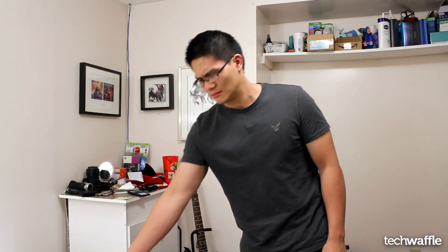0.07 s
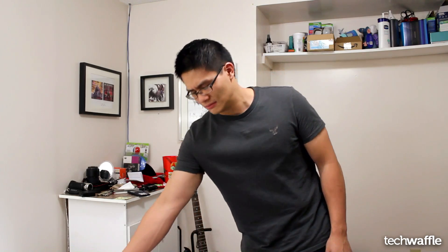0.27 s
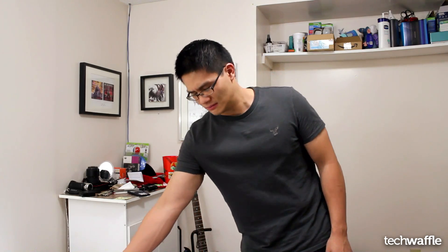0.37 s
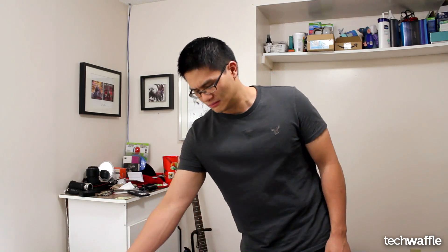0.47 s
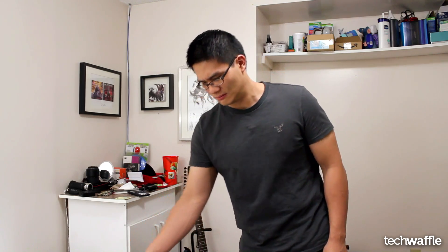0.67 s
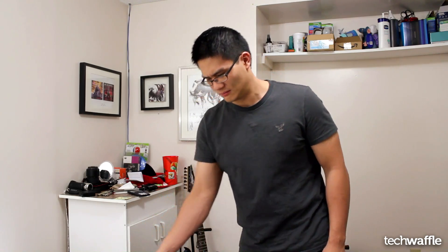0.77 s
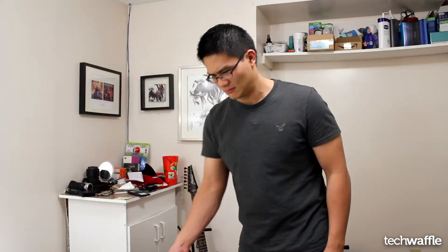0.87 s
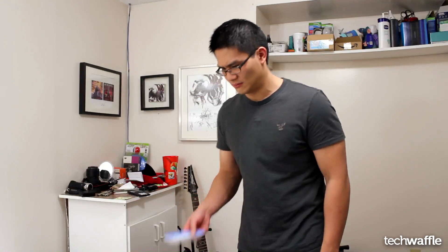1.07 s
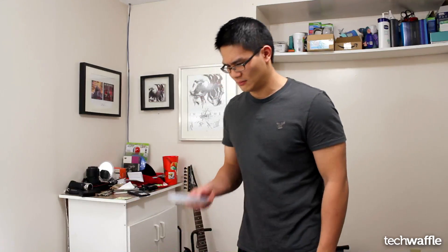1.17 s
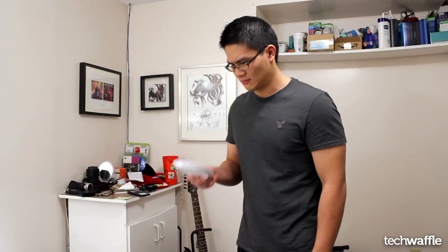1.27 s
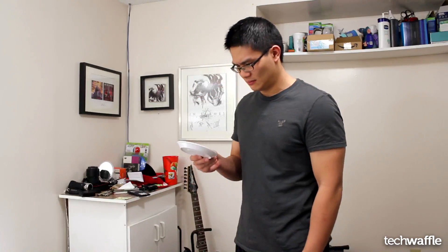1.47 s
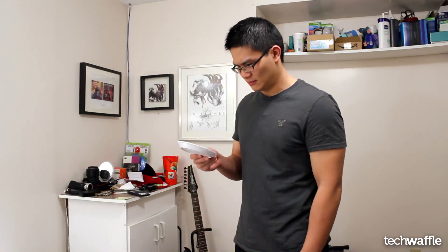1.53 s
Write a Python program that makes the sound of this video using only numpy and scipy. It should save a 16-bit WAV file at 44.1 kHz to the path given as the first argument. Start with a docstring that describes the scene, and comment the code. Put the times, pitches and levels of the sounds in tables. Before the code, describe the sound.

A light, hollow object is dragged over a wooden top in a small, quiet room. It starts with a dull shove at about 0.25 seconds and a close knock at 0.4. A rough, juddering slide follows, ending in a brighter scrape around 0.9 as the object lifts and rings briefly. Faint finger handling comes near 1.5 seconds, over a low hum and soft hiss.

```python
"""Hollow object dragged over wood

A light, hollow object crosses a wooden top in a small, quiet room: a dull shove, a knock, a rough
juddering slide and a brighter scrape as its edge lifts off. Tiny catches of the surface and the
blows ring the same resonances over a stick-slip groan. The freed object sings briefly, then
faint handling and a low hum remain."""
import sys
import numpy as np
from scipy import signal
from scipy.fft import rfft, irfft
from scipy.io import wavfile

SR = 44100
rng = np.random.default_rng(int(sys.argv[2]) if len(sys.argv) > 2 else 0)


def int16_out(signal):
    """Quantize to a 16-bit WAV file."""
    q = np.round(np.clip(np.atleast_2d(signal).T, -1, 1) * 32767)
    wavfile.write(sys.argv[1], SR, q.astype(np.int16))


N = 70560

# tone of the room hiss (frequency [Hz], gain [dB])
AIR_EQ = [(25, -38), (60, -14), (110, -6.5), (180, -7), (260, -5.5), (330, -9), (820, -7.5), (1200, -9),
          (2000, -10.5), (4000, -12.5), (8000, -20.5), (15500, -26)]
# partials of the hum (frequency [Hz], level [dB])
HUM_PARTIALS = [(177.6, -59.5), (403.7, -66.5), (689.1, -65.5), (764.4, -84), (839.8, -63.5)]
# soft finger touches (time [s], width [s], level [dB])
TOUCHES = [(1.478, .012, -51), (1.52, 0.014, -59.5), (1.575, 0.034, -57)]
# tone of the fingers (frequency [Hz], gain [dB])
FINGER_EQ = [(60, -4), (250, 10), (700, -1.5), (1500, 1.5), (4000, -3), (15000, -22)]
# resonances of object, top and room (frequency [Hz], T60 [s], gain [dB])
BODY_MODES = [(163.3, 0.2, 5), (190, 0.17, 4), (245.8, 0.24, 12.5), (284, 0.45, 6.5), (344, 0.25, -13),
              (397.3, 0.13, 10.5), (534, 0.38, 6.5), (558.8, 0.093, 8), (632, 0.5, 4), (744, 0.037, 7),
              (770, 0.18, -1), (801, 0.06, 3.5), (1356, 0.24, 8), (1370.6, 0.26, 10), (1763, 0.027, 2.5),
              (2050, 0.59, -21), (2992, 0.12, 10), (3340, 0.07, -3)]
# knocks and ticks (time [s], relative thud level [dB], relative click level [dB])
BLOWS = [(0.2792, -14.5, -14), (.3125, -16.5, -34), (.4285, -3.5, -3.5), (.4332, -6, -15),
         (.5635, -23, -18.5), (0.889, -31, -25), (0.905, -45, -21.5), (.9215, -26, -23)]
# tone of the dull thud (frequency [Hz], gain [dB])
THUD_EQ = [(30, -28), (85, -41), (150, 5.5), (300, -3), (700, 1), (1100, -10.5), (2000, -6.5),
           (4000, -53.5), (8000, -51), (16000, -65)]
# tone of the edge click (frequency [Hz], gain [dB])
CLICK_EQ = [(100, -45), (1500, 2.5), (4500, 11), (8000, -8), (13000, -4), (16000, -7)]
# tone of the rubbing (frequency [Hz], gain [dB])
RUB_EQ = [(40, -51), (100, -49.5), (150, -2.5), (300, -2), (480, -1), (780, -5.5), (1100, -4), (1800, -8.5),
          (3200, -13.5), (5000, -22), (8000, -23.5), (15000, -47.5)]
# tone of the gritty hiss (frequency [Hz], gain [dB])
GRIT_EQ = [(100, -41), (2500, 2), (6000, 27.5), (8000, 35.5), (13000, 23), (16000, 17.5)]
# strokes of the drag (start [s], attack [s], hold [s], release per 20 dB [s], rub level [dB],
# bass [dB], treble [dB], grit level [dB], contact resonance [Hz], its boost [dB],
# judder rate [Hz], judder level [dB], chatter [0-1])
DRAG_STROKES = [(0.235, 0.013, 0.031, 0.082, -19.5, 0, -7.5, -45.5, 930, 4, 232, -24, .5),
                (0.3, 0.0083, 0.027, 0.058, -21.5, 5, -7, -59, 388, 0, 188, -20.5, 0.55),
                (0.41, 0.016, 0.053, 0.042, -18, 1.5, -7.5, -59, 410, 0, 188, -24, 0.44),
                (0.474, .018, 0.091, 0.095, -22.5, -3, -1.5, -49, 1600, 1, 161.7, -32.5, .45),
                (0.594, 0.036, 0.069, 0.031, -21, 9, 9.5, -46, 360, 18.5, 297.7, -28.5, 0.55),
                (0.684, 0.023, 0.07, 0.093, -18, -3.5, -3, -44, 378, 4, 239.5, -19.5, 0),
                (0.839, 0.0096, 0.062, 0.049, -21.5, -12.5, 6, -41, 1295, 4.5, 162, -27.5, 0.71)]

AIR_DB, AIR_FALL_DB_S = -51.5, 2
ROOM_DB, ROOM_T60_S, ROOM_TREBLE_T60_S, ROOM_CROSSOVER_HZ = -5, 0.23, 0.31, 3100
KNOCK_ROOM_SHARE = 0.55  # blows sound close and stir the room less than the rubbing
THUD_DB, CLICK_DB, CLICK_DECAY_S = 28.5, -3, .0005
BASS_SHELF_HZ, TREBLE_SHELF_HZ = 412, 1220
CATCHES_PER_S, CATCH_SPREAD_DB = 10000, 3
CHATTER_HZ, CHATTER_DECAY_S = 135.3, .003


def undb(db):
    return 10 ** (np.asarray(db) / 20)


def unit(x):
    return x / np.sqrt(np.mean(x ** 2) + 1e-18)


def convolve(x, response):
    return signal.fftconvolve(x, response)[:N]


def butter(x, hz, order=2, kind="low"):
    return signal.sosfilt(signal.butter(order, hz, kind, fs=SR, output="sos"), x)


def eq(x, points, bass_db=0, treble_db=0, size=4096):
    """Minimum-phase EQ through (Hz, dB) points, with a bass and a treble shelf."""
    hz, db = np.array(points, float).T
    f = np.maximum(np.fft.rfftfreq(size, 1 / SR), 1)
    shelves = bass_db / (1 + (f / BASS_SHELF_HZ) ** 4) + treble_db / (1 + (TREBLE_SHELF_HZ / f) ** 4)
    curve_db = np.interp(np.log(f), np.log(hz), db) + shelves
    cepstrum = irfft(np.log(undb(curve_db)))
    cepstrum[1:size // 2] *= 2
    cepstrum[size // 2 + 1:] = 0
    return convolve(x, irfft(np.exp(rfft(cepstrum))))


def room_tone(t):
    """A bed of slowly fading hiss with a slightly wavering, fan-like hum."""
    bed = unit(eq(rng.standard_normal(N), AIR_EQ)) * undb(AIR_DB - AIR_FALL_DB_S * (t - t.mean()))
    for hz, db in HUM_PARTIALS:
        waver_hz = 1.3 * unit(butter(rng.standard_normal(N), 12))
        bed += undb(db) * unit(np.sin(2 * np.pi * np.cumsum(hz + waver_hz) / SR))
    return bed


def room_reverb(x, t):
    """Close walls add a short diffuse tail whose treble lingers a little longer."""
    noise = butter(rng.standard_normal(N), 510, kind="high")
    mids = butter(noise, ROOM_CROSSOVER_HZ, order=1) * undb(-60 * t / ROOM_T60_S)
    treble = butter(noise, ROOM_CROSSOVER_HZ, order=1, kind="high") * undb(-60 * t / ROOM_TREBLE_T60_S)
    tail = butter(mids + treble, 13500, order=1) * np.clip(t / 0.0021, 0, 1)
    return x + undb(ROOM_DB) * convolve(x, tail / np.linalg.norm(tail))


def handling(t):
    """Fingers brush the lifted object in soft swells as it is turned over."""
    swells = sum(undb(db) * np.exp(-.5 * ((t - at) / width) ** 2) for at, width, db in TOUCHES)
    return swells * unit(eq(catches(t, chatter=0.37), FINGER_EQ))


def release_ring(t, start_s=.92, hz=1326, t60_s=0.43, db=-34):
    """No longer damped by the top, the object sings on briefly at one resonance."""
    since = np.maximum(t - start_s, 0)
    envelope = undb(db - 60 * since / t60_s) * np.clip(since / .01, 0, 1)
    return envelope * np.sin(2 * np.pi * hz * since)


def body(push, t):
    """The push itself plus the hollow resonances that it rings."""
    ring = np.zeros(N)
    for hz, t60, db in BODY_MODES:
        decay = np.log(1000) / t60
        ring += undb(db) * 2 * decay / SR * np.exp(-decay * t) * np.cos(2 * np.pi * hz * t)
    return push + convolve(push, ring)


def knocks(t):
    """Each blow is a thud into the body and a sharp click of the hard edge."""
    thuds, clicks = np.zeros(N), np.zeros(N)
    for at, thud_db, click_db in BLOWS:
        onset = int(at * SR)
        thuds[onset] += undb(THUD_DB + thud_db)
        burst = rng.standard_normal(N) * np.exp(-t / CLICK_DECAY_S)
        clicks[onset:] += undb(CLICK_DB + click_db) * burst[:N - onset]
    return body(eq(thuds, THUD_EQ), t) + eq(clicks, CLICK_EQ)


def slips(hz, jitter, spread_db, count=1200):
    """Stick-slip pulses, each with its own period and size."""
    gap, size = rng.standard_normal((count, 2)).T
    at = (np.cumsum(np.exp(jitter * gap)) * SR / hz).astype(int)
    return np.bincount(at[at < N], undb(spread_db * size)[at < N], N)


def catches(t, chatter):
    """Dense tiny catches of the rough surface; chatter bunches them as the grip comes in spurts."""
    grabs = slips(CHATTER_HZ, jitter=.3, spread_db=2.5)
    spurts = unit(convolve(grabs, np.exp(-t / CHATTER_DECAY_S)))
    size = undb(CATCH_SPREAD_DB * np.minimum(rng.exponential(size=N), 3))
    polarity = rng.choice([-1, 1], N)
    caught = rng.random(N) < CATCHES_PER_S / SR
    return size * polarity * caught * (1 - chatter + chatter * spurts)


def judder(hz):
    """Nearly regular stick-slip, band-passed to a low groan."""
    pulses = slips(hz, jitter=0.0317, spread_db=3.5)
    return unit(butter(butter(pulses, 306, order=4), 162, order=6, kind="high"))


def contact_resonance(x, hz, boost_db):
    """A broad peak that depends on where the object touches."""
    b, a = signal.iirpeak(hz, Q=1 / 0.19, fs=SR)
    return x + (undb(boost_db) - 1) * signal.lfilter(b, a, x)


def drag(t):
    """Each stroke rubs the body, hisses with grit and judders at its own rate."""
    out = np.zeros(N)
    for (start, attack, hold, release, rub_db, bass_db, treble_db, grit_db,
         contact_hz, boost_db, judder_hz, judder_db, chatter) in DRAG_STROKES:
        since_hold = np.maximum(t - start - attack - hold, 0)
        effort = np.clip((t - start) / attack, 0, 1) * undb(-20 * since_hold / release)
        texture = catches(t, chatter)
        friction = contact_resonance(eq(texture, RUB_EQ, bass_db, treble_db), contact_hz, boost_db)
        effort_rms = np.sqrt(np.mean(effort ** 2))
        rub = undb(rub_db) * effort_rms * unit(body(effort * friction, t))
        groan = undb(judder_db) * judder(judder_hz)
        grit = undb(grit_db) * unit(eq(texture, GRIT_EQ))
        out += rub + effort * (groan + grit)
    return out


def scene():
    """Mono mix: drag, handling and part of the knocks feed the room; the rest stays dry."""
    t = np.arange(N) / SR
    blows = knocks(t)
    in_room = room_reverb(drag(t) + handling(t) + KNOCK_ROOM_SHARE * blows, t)
    close = (1 - KNOCK_ROOM_SHARE) * blows + release_ring(t)
    return (in_room + close + room_tone(t))[None]


def record(dry):
    """Peaks clip just under full scale, then a steep low-pass trims the very top."""
    high_cut = signal.ellip(8, .2, 70, 16100, fs=SR, output="sos")
    return signal.sosfilt(high_cut, np.clip(dry, -.92, .92))


dry = scene()
out = record(dry)
int16_out(out)
```